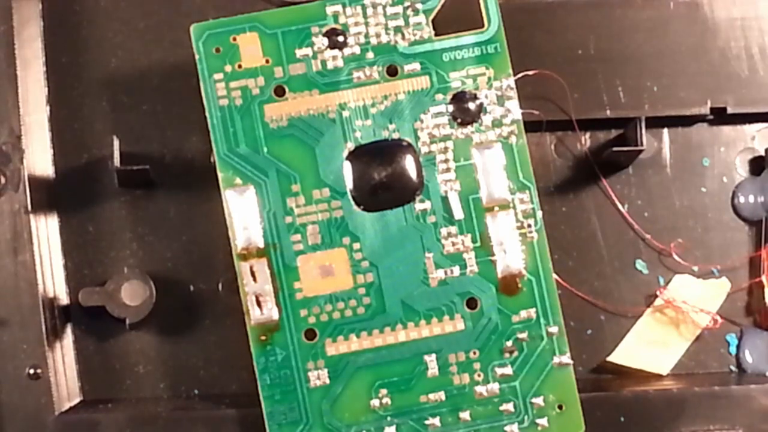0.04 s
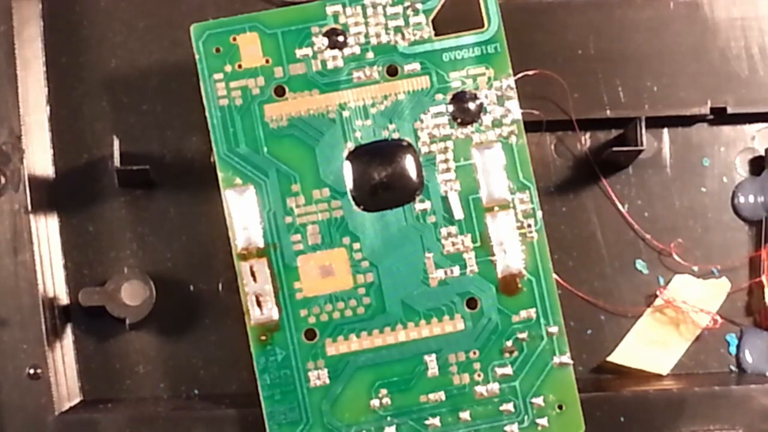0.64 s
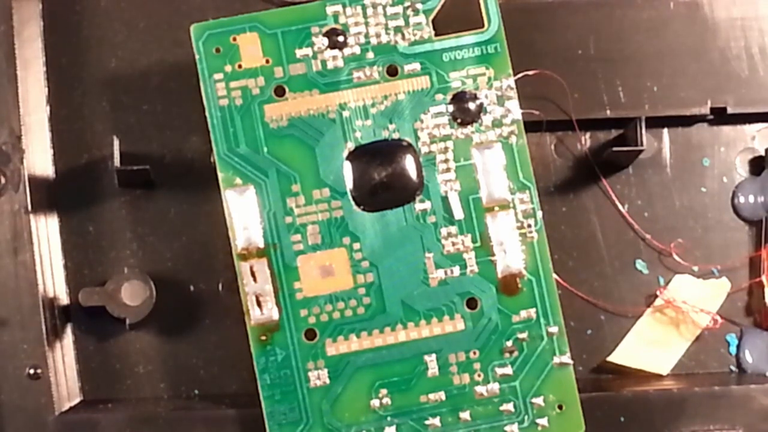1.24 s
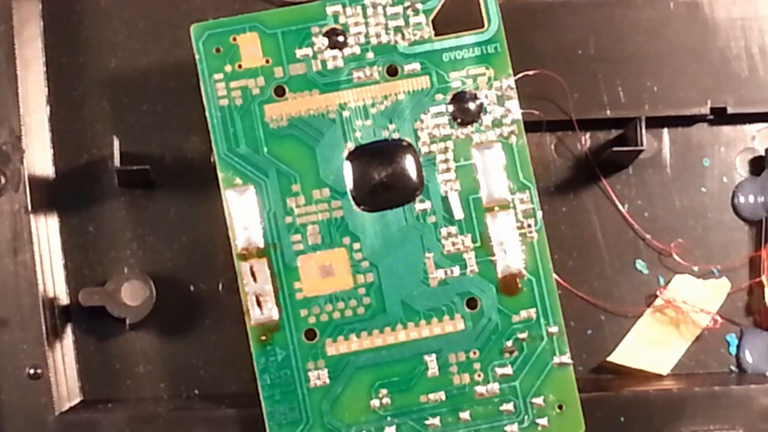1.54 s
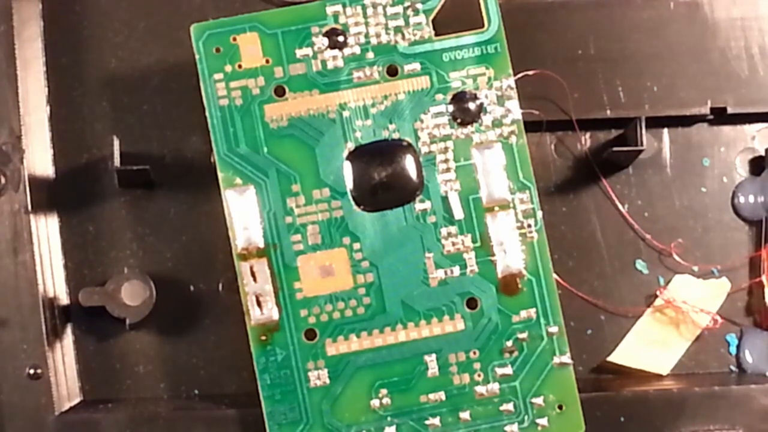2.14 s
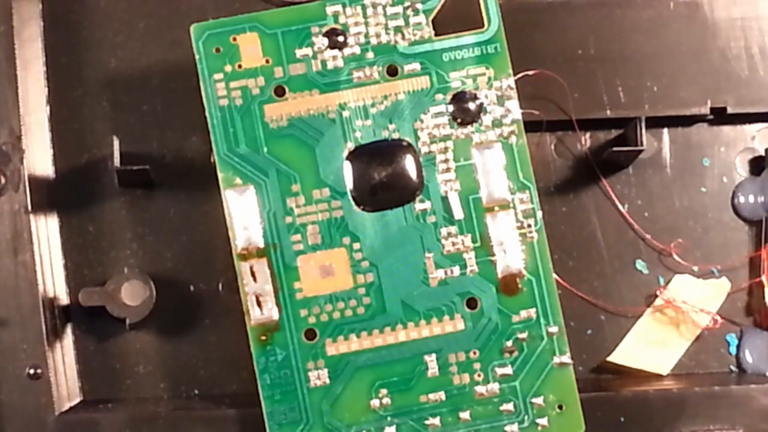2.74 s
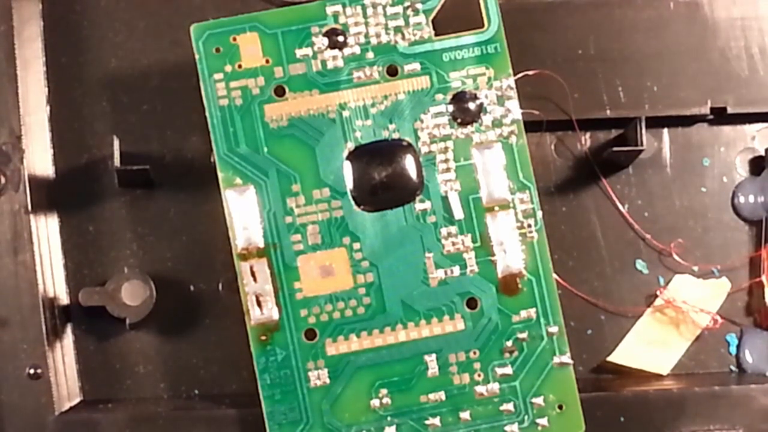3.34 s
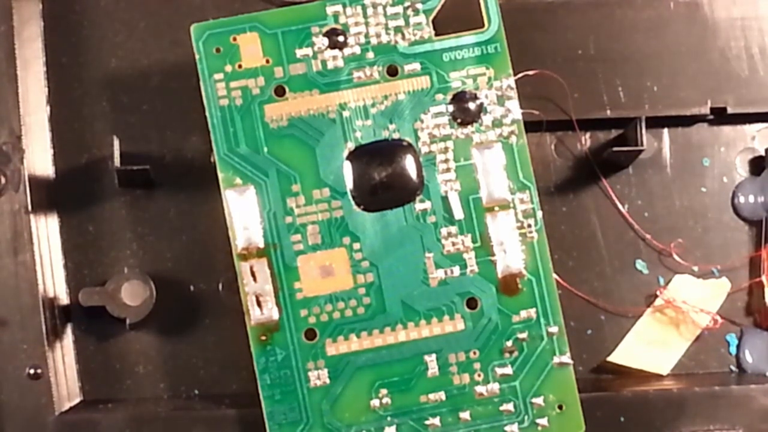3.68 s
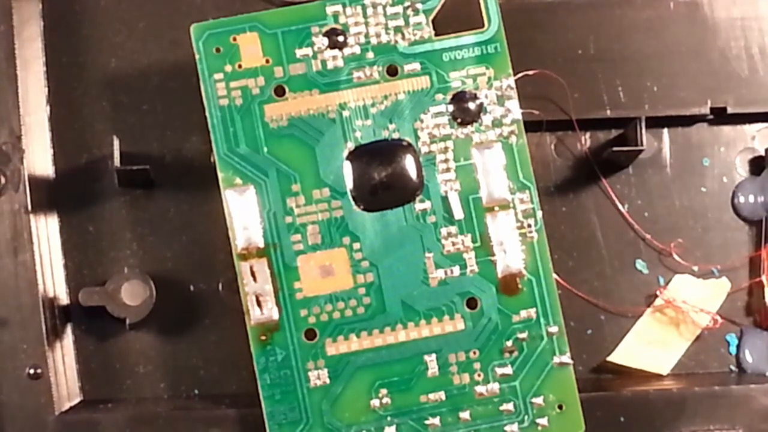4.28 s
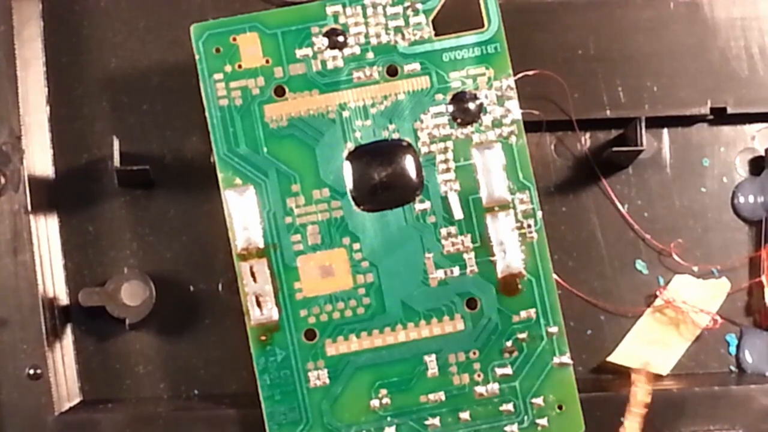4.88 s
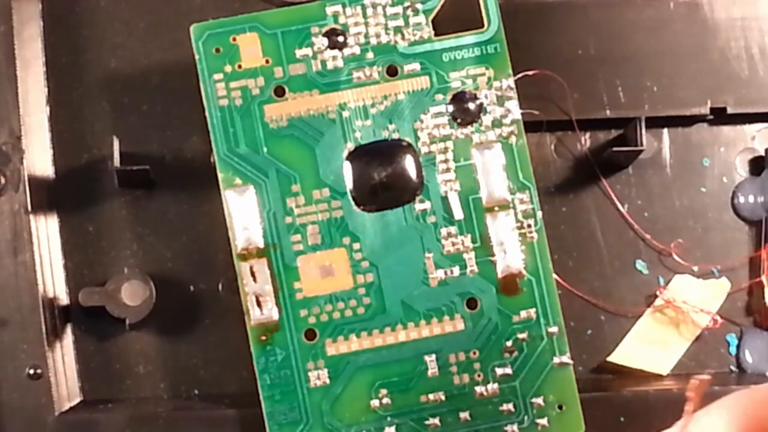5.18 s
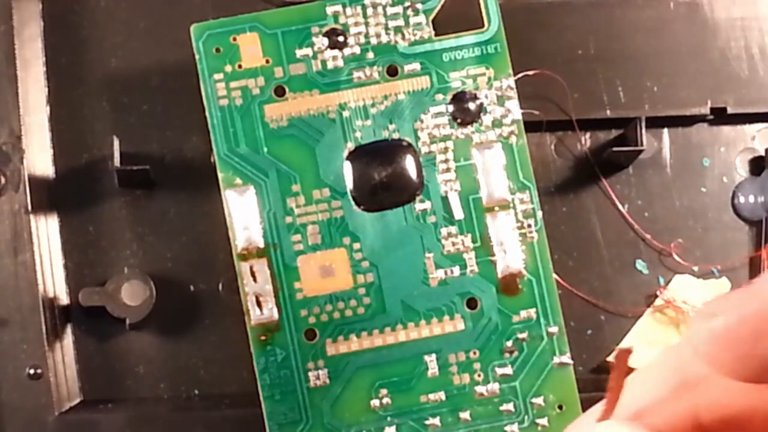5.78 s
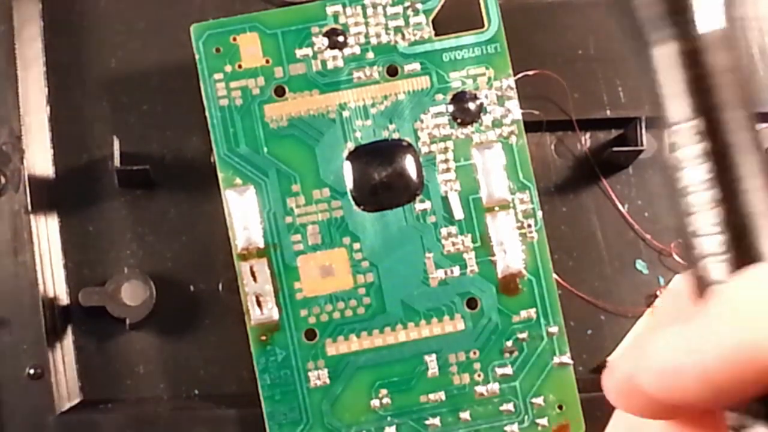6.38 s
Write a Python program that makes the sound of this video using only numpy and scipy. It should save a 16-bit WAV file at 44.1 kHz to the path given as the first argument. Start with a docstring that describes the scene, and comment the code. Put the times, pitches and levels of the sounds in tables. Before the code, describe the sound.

Small metal cutters knock, scrape and clack with a brief ring on a workbench, and snip once through copper wick.

```python
"""Hand tools on a workbench in a small room, heard in stereo from close by.
A fan and mains hum run throughout. After two faint clicks of jaws, a tool is put down with a knock.
Steel cutters graze the bench, are dragged over it, sticking, slipping and squealing, then clack
against it and ring. Their jaws snap shut through a piece of copper wick. Last, they are dropped
back on their tips, skid a little and give one more faint click."""
import sys
import numpy as np
from scipy import signal
from scipy.fft import rfft, irfft
from scipy.io import wavfile
from scipy.ndimage import uniform_filter1d

SR = 44100
rng = np.random.default_rng(int(sys.argv[2]) if len(sys.argv) > 2 else 0)


def bounce(signal):
    """Save signal as a 16-bit WAV file at the path given by the first command-line argument."""
    frames = np.transpose(np.atleast_2d(signal))
    limited = np.clip(frames, -1, 1)
    pcm = np.round(limited * 32767).astype(np.int16)
    wavfile.write(sys.argv[1], SR, pcm)


N = 283122

# the parts of the cutters that can hit the bench: side, tips, edge
CUTTER_PARTS = ["side", "tips", "edge"]


def amp(db):
    """Turn decibels into a gain."""
    return 10 ** (np.asarray(db) / 20)


def along(points, hz):
    """Read a curve of (frequency, value) points on a logarithmic frequency axis."""
    f, value = np.transpose(points)
    return np.interp(np.log(hz + 1), np.log(f), value)


def bins(size):
    """The frequencies in the spectrum of a sound this many samples long."""
    return np.arange(size // 2 + 1) * SR / size


def level(x, db, seconds=.01):
    """Scale a sound so that its energy, spread over the given time, has this average level."""
    return x * amp(db) * np.sqrt(seconds * SR / np.mean(np.sum(x ** 2, axis=-1)))


def add(out, start, x):
    """Mix a sound in at a start time in seconds."""
    i = int(start * SR)
    out[:, i:i + x.shape[1]] += x[:, :N - i]


def convolve(x, response):
    """Pass each channel through a response: the sound a thing makes after one tiny tap."""
    return signal.fftconvolve(np.atleast_2d(x), np.atleast_2d(response), axes=1)


def body(colour, peaks, tilt_db=0, size=8192):
    """How an object answers a tap: a broad tone colour, tilted by tilt_db per octave, plus resonances."""
    f = bins(size)
    db = along(colour, f) + tilt_db * np.log2(np.maximum(f, 200) / 1000)
    db = db + sum(boost / (1 + (2 * (f - hz) / width) ** 2) for hz, width, boost in peaks)
    # folding the cepstrum puts all of the sound after the tap
    cepstrum = irfft(np.log(amp(db)))
    cepstrum[1:size // 2] *= 2
    cepstrum[size // 2 + 1:] = 0
    return irfft(np.exp(rfft(cepstrum)))


def scatter(size):
    """White noise arriving from all sides: left and right are more alike low down than in the treble."""
    likeness = [(40, 0.11), (150, 0.63), (300, 0.58), (600, 0.38), (1200, -0.09), (2500, -0.25),
                (6000, -0.028)]  # how alike the two sides are: f/Hz, correlation
    mid, side = rfft(rng.standard_normal((2, size)))
    alike = np.clip(along(likeness, bins(size)), -1, 1)
    mid, side = mid * np.sqrt((1 + alike) / 2), side * np.sqrt((1 - alike) / 2)
    return irfft(np.array([mid + side, mid - side]), size)


def even(x, width_hz):
    """Give a burst the same energy in every band of this width."""
    spectrum = rfft(x)
    count = max(int(width_hz * x.shape[1] / SR), 1)
    band_power = np.abs(uniform_filter1d(np.abs(spectrum) ** 2, count))
    return irfft(spectrum / np.sqrt(band_power + 1e-12), x.shape[1])


def from_left(x, lead_s):
    """A sound from the left reaches the left channel earlier and with more high treble."""
    shading = [(300, 0.5), (700, -0.5), (1400, -0.5), (2400, -.5), (4400, -1), (8000, 6.5), (15000, 2)]  # difference between the sides: f/Hz, left minus right/dB
    f = bins(x.shape[1])
    shade = amp(along(shading, f) / 2)
    delay = np.exp(-2j * np.pi * f * lead_s)
    return irfft(rfft(x) * np.array([shade, delay / shade]), x.shape[1])


def spread(force, split_hz):
    """A wide surface sends the same bass to left and right, but different treble."""
    f = bins(force.shape[1])
    common, opposed = rfft(force)
    opposed = opposed * f / (f + split_hz)
    return irfft(np.array([common + opposed, common - opposed]), force.shape[1])


def contact(seconds, split_hz, size=4096):
    """The force of a blow: a rattle of tiny contacts that swells and dies within milliseconds."""
    progress = np.arange(size) / SR / max(seconds, 1 / SR)
    swell = progress * np.exp(-progress)
    force = spread(rng.standard_normal((2, size)) * swell, split_hz)
    for _ in range(2):
        force = even(force, width_hz=120) * np.minimum(1, 10 * swell)
    return force


def room(x, wet_db, size=24576):
    """Direct sound plus echoes off the walls that build up within milliseconds; the bass stays longest."""
    echo_times = [(100, 0.8), (250, 0.4), (600, 0.23), (1400, 0.2), (3000, 0.2), (7000, 0.16),
                  (14000, 0.12)]  # the room's echo: f/Hz, time to fade by 60 dB/s
    t, f = np.arange(size) / SR, bins(size)
    noise = rfft(even(scatter(size), width_hz=30))
    centres = [hz for hz, _ in echo_times]
    tail = 0
    for share, (_, fade_s) in zip(np.eye(len(centres)), echo_times):
        band = irfft(noise * along(np.c_[centres, share], f))
        tail = tail + band * np.exp(-np.log(1000) * t / fade_s)
    build_up = 1 - np.exp(-(t / 0.0028) ** 2)
    response = level(tail * build_up, wet_db, 1 / SR)
    response[:, 0] += 1  # the direct sound
    return convolve(x, response)[:, :N]


def fan_and_hum():
    """A fan murmurs in the room's low resonances, over hiss and a little mains hum."""
    colour = [(20, -29), (40, -23.5), (64, -10), (124, -11.5), (200, -10), (280, -7.5), (410, -11.5),
              (690, -15), (900, -15.5), (1900, -17), (3500, -21), (6400, -26), (10000, -24), (14500, -25)]  # tone of the fan's noise: f/Hz, level/dB
    peaks = [(86.7, 46, -7.5), (113.4, 37, 9.5), (176.7, 8.8, 13), (230, 20, 4.5), (273.3, 16, 10),
             (626, 14, 8), (674.3, 21.7, 11)]  # low resonances: f/Hz, width/Hz, boost/dB
    hum_hz = 120
    air = convolve(scatter(N), body(colour, peaks))[:, :N]
    hum = np.sin(2 * np.pi * hum_hz * np.arange(N) / SR)
    return level(air, db=-54, seconds=N / SR) + level(hum, db=-66.5, seconds=N / SR)


def snips():
    """The jaws click shut in the air: one tiny snap and a trace of rattle, brighter when harder."""
    clicks = [(0.102, -49, 1920), (.47, -58, 4840), (2.324, -57, 1700), (4.074, -55, 3230),
              (4.12, -40, 3940), (4.956, -59.5, 3200)]  # jaw clicks, the loudest being the cut: t/s, level/dB, f/Hz
    colour = [(300, -24), (1200, -22), (2600, -10), (3700, -7.5), (5000, -4.5), (7000, -6.5), (8500, -17),
              (14500, -25)]  # tone of a click: f/Hz, level/dB
    peaks = [(3922, 700, 5.5), (7080, 600, 6.5), (9200, 320, 18)]  # resonances of the jaws: f/Hz, width/Hz, boost/dB
    full_snap_db = -38.5
    out = np.zeros((2, N))
    for start, db, hz in clicks:
        softer_db = max(full_snap_db - db, 0)
        rattle = contact(seconds=.0001 * (1 + .65 * softer_db), split_hz=13000)
        force = level(rattle, db=-6.5, seconds=1 / SR)
        force[:, 0] += 1  # the snap itself
        jaws = body(colour, peaks + [(hz, 420, 10)], tilt_db=-0.5 - 0.31 * softer_db)
        click = from_left(convolve(force, jaws), lead_s=.00002)
        add(out, start, level(click, db))
    return room(out, wet_db=-6.0)


def knocks():
    """Blunt blows on the bench: soft ones are slower and duller, hard ones wake the tool's hollow tone."""
    blows = [(.847, -45.5), (.886, -9.5), (0.9099, -20), (.963, -31.5), (1.8, -47.5), (2.115, -46),
             (2.466, -34.5)]  # tools and hand hitting the bench: t/s, level/dB
    colour = [(50, -37.5), (130, -15.5), (280, -6.5), (400, -4.5), (650, -1.5), (1200, -2.5), (1800, -9),
              (2900, -11.5), (4400, -17.5), (5800, -28.5), (8500, -33), (14500, -55.5)]  # tone of a knock: f/Hz, level/dB
    peaks = [(265, 51, 1.5), (410, 49, -12.5), (616, 80, 4.5), (821, 76, 6.5), (980, 60, 3),
             (1850, 160, -1.5), (2096, 110, 11)]  # what a knock rings with: f/Hz, width/Hz, boost/dB
    full_blow_db = -12
    out = np.zeros((2, N))
    for start, db in blows:
        softer_db = max(full_blow_db - db, 0)
        hollow_tone = (1439, 290, 14.5 - 0.95 * softer_db)
        force = contact(seconds=.0018 * (1 + 0.025 * softer_db), split_hz=4500)
        hit = convolve(force, body(colour, peaks + [hollow_tone], tilt_db=-0.26 * softer_db))
        add(out, start, level(from_left(hit, lead_s=0.00024), db))
    return room(out, wet_db=-4.5)


def slides():
    """The cutters graze, drag and skid over the bench; the steel rings where it springs free."""
    graze = [(1.775, -58), (1.8, -55), (1.825, -73)]  # rubbing force as they are reached for: t/s, level/dB
    drag = [(2.368, -47), (2.376, -39), (2.462, -42.5), (2.47, -32), (2.498, -43), (2.564, -32.5),
            (2.596, -36.5), (2.65, -34), (2.7, -41), (2.734, -24.5), (2.786, -60), (2.8, -27.5),
            (2.88, -29.5), (2.894, -45.5), (2.916, -30), (2.936, -49.5), (2.956, -42.5), (2.98, -55)]  # rubbing force as they are dragged: t/s, level before gain/dB
    skid = [(4.56, -34), (4.58, -36), (4.628, -33), (4.66, -52)]  # rubbing force after they are dropped: t/s, level/dB
    releases = [(2.865, "edge", -44), (2.948, "edge", -41), (4.62, "tips", -40)]  # the jaws spring free: t/s, part, ring level/dB
    rubbing = rub(graze, gain_db=0, light_judder_db=0)
    rubbing += rub(drag, gain_db=2, light_judder_db=12.5)
    rubbing += rub(skid, gain_db=0, light_judder_db=9.5)
    rings = np.zeros((2, N))
    for start, part, ring_db in releases:
        add(rings, start, steel_ring(part, ring_db))
    return room(rubbing + squeals(), wet_db=-8.5) + rings


def stick_slip(times, force_db, gain_db, size=32768):
    """The jaws stick and slip in dense, uneven jolts. Gives the sample times and the force."""
    snags = [(2.376, 7), (2.399, 12), (2.469, 8), (2.617, 6)]  # the jaws snag and jerk free: t/s, jump in force/dB
    slips_per_s, slip_s, steady_grip, snag_s = 900, .00092, .6, 0.0022
    t = times[0] + np.arange(size) / SR
    slipping = rng.random(size) < slips_per_s / SR
    slips = slipping * amp(2 * np.minimum(rng.exponential(size=size), 3))
    grip = steady_grip + signal.lfilter([1], [1, -np.exp(-1 / (slip_s * SR))], slips)
    rasp = even(spread(rng.standard_normal((2, size)) * grip, split_hz=5200), width_hz=60)
    jerk_db = sum(db * (t >= start) * np.exp(-np.abs(t - start) / snag_s) for start, db in snags)
    push = amp(np.interp(t, times, force_db) + jerk_db) * (t < times[-1])
    return t, level(rasp, gain_db, size / SR) * push


def rub(curve, gain_db, light_judder_db):
    """Sliding jaws shake the bench: it can judder under a light touch and growls under a hard push."""
    colour = [(60, -40), (130, -20), (260, 0), (520, -0.5), (720, 1.5), (1200, -8.5), (1800, -1.5),
              (2900, -3.5), (4800, -5.5), (5800, -18), (8000, -23), (10500, -25.5), (14500, -43)]  # tone of the rubbing: f/Hz, level/dB
    resonances = [(270.6, 15, 5.5), (394, 16, -31), (467, 44, 10.5), (988, 20, 14.5), (1437, 23, 11.5),
                  (1763, 120, 8.5), (1855, 38, 5.5), (1992, 42, 14), (2400, 120, 0), (2528, 51, 9),
                  (2630, 47, 7), (3190, 57, 12), (3650, 65, 11.5), (3740, 48, 8), (4530, 300, 6),
                  (5270, 140, 4.5), (6830, 150, 10.5), (8800, 65, -3), (10070, 110, 12)]  # what the sliding jaws set ringing: f/Hz, width/Hz, boost/dB
    light_db, hard_db, spot_s = -38, -29, .06
    times, force_db = np.transpose(curve)
    t, force = stick_slip(times, force_db, gain_db)
    out = np.zeros((2, N))
    for moment in np.arange(times[0], times[-1] + spot_s, spot_s):
        pressed_db = np.interp(moment, times, force_db)
        hard = np.clip((pressed_db - light_db) / (hard_db - light_db), 0, 1)
        light = 1 - hard
        judder = (744, 113, light * light_judder_db - hard * 1.5)
        growl = (1290, 550, hard * 3.5 - light * 5.5)
        peaks = np.array(resonances + [judder, growl], float)
        # the point of contact travels, and each spot rings a little differently
        detune, reweight = rng.uniform(-0.98, 1, (2, len(peaks)))
        peaks[:, 0] *= 1 + .018 * detune
        peaks[:, 2] += 2.5 * reweight
        spot = level(body(colour, peaks, tilt_db=light * 0.44 + hard * 0.16), 0, 1 / SR)
        crossfade = np.maximum(1 - np.abs(t - moment) / spot_s, 0)
        add(out, times[0], from_left(convolve(force * crossfade, spot), lead_s=.00012))
    return out


def squeals(size=8192):
    """Where the jaws catch, friction feeds a few of their narrow resonances."""
    catches = [(2.375, .085, -43), (2.847, 0.0366, -37), (2.907, .02, -37.5)]  # the jaws catch: t/s, length/s, level/dB
    tones = [(4290, 34, 0), (1910, 21, -2), (6620, 54, -12)]  # tones of the squeal: f/Hz, width/Hz, level/dB
    out = np.zeros((2, N))
    t = np.arange(size) / SR
    jaws = sum(amp(db) * np.sqrt(width) * np.exp(-np.pi * width * t) * np.sin(2 * np.pi * hz * t)
               for hz, width, db in tones)
    for start, seconds, db in catches:
        burst = rng.standard_normal((2, size)) * (t < seconds)
        force = even(spread(burst, split_hz=4600), width_hz=100)
        squeal = from_left(convolve(force, jaws), lead_s=.00004)
        add(out, start, level(squeal, db, seconds))
    return out


def steel_ring(part, db, size=28000):
    """The cutters and the bench under them ring on; the part struck sets how loud each tone is."""
    # ringing tones: f/Hz, time to fade by 60 dB/s, side level/dB, tips level/dB, edge level/dB
    tones = [(273, 0.39, -11.5, -6, -23), (354, 0.51, -18.5, -17, -4), (539, 0.55, -35, -6, -15),
             (665, 0.35, -4, -32, -10), (1540, 0.38, -8, -7, -30), (1684, 0.4, 0, -5, -18),
             (1860, 0.16, -35, -28, 2), (1888, 2.3, -28, -27, -40), (2080, 3.9, -32, -38, -39),
             (2674, 0.16, -9, -25, -5), (2920, 0.75, -23, -27, -27), (3210, 0.2, -20, -5, 1),
             (3380, 0.72, -25, -11, -24), (3585, 1.03, -26, -28, -15.5), (3725, 0.65, -30, -19, -27),
             (6500, 0.35, -21, -21, -29), (9360, 0.36, -17.5, -35, -35)]
    t = np.arange(size) / SR
    ring = 0
    for hz, fade_s, *part_db in tones:
        # left and right drift further out of step for higher tones
        phase = rng.uniform(0, 2 * np.pi) + rng.standard_normal((2, 1)) * min(hz / 3000, 1)
        fade = amp(db + part_db[CUTTER_PARTS.index(part)]) * np.exp(-np.log(1000) * t / fade_s)
        ring = ring + fade * np.sin(2 * np.pi * hz * t + phase)
    return ring * (1 - np.exp(-t / 0.0023))


def clacks():
    """Steel meets the bench: a hard crack, a thud of the struck spot, then the ring."""
    # the cutters land: t/s, part, level/dB, contact time/s, tilt/dB per octave, ring level/dB
    landings = [(3.1825, "side", -20, 0.0033, -0.5, -29.5), (4.5085, "tips", -13.5, 0.0028, 2.5, -32.5)]
    colour = [(50, -39), (120, -6), (300, -7), (700, -1), (1500, -0.5), (2400, -2), (3700, -0.5),
              (4700, -0.5), (6000, -9), (8500, -13.5), (14500, -22)]  # tone of a clack: f/Hz, level/dB
    # short resonances of cutters and bench together: f/Hz, width/Hz, side boost/dB, tips boost/dB
    resonances = [(264, 68, 4, 12), (476.4, 43, 15, 20), (607, 124, -14, -0.5), (711, 212, 10, 26.5),
                  (883, 63, -18, -9), (1092, 65, 11, 10), (1540, 134, 16.5, -6), (1688, 53, -17, 14.5),
                  (2025, 68, -11, -12), (2060, 160, 7, 13), (2270, 62, -9, -5), (2640, 150, 7, 5),
                  (3170, 180, 11, 5), (3840, 100, 12, 4)]
    out, rings = np.zeros((2, 2, N))
    for start, part, db, contact_s, tilt_db, ring_db in landings:
        peaks = [(hz, width, boost[CUTTER_PARTS.index(part)]) for hz, width, *boost in resonances]
        hit = convolve(contact(contact_s, split_hz=1600), body(colour, peaks, tilt_db))
        add(out, start, level(from_left(hit, lead_s=.0001), db))
        add(rings, start, steel_ring(part, ring_db))
    return room(out, wet_db=-4.5) + rings


def lower_hiss(x, threshold_db, depth_db, release_s):
    """The treble is turned down in the quiet and stays open for a moment after each loud sound."""
    loud = uniform_filter1d(np.mean(x ** 2, axis=0), SR // 100) > amp(threshold_db) ** 2
    i = np.arange(N)
    since_loud = (i - np.maximum.accumulate(np.where(loud, i, -N))) / SR
    treble = signal.sosfilt(signal.butter(1, 3000, "high", fs=SR, output="sos"), x)
    treble_gain = amp(-depth_db * (1 - np.exp(-since_loud / release_s)))
    return x - treble * (1 - treble_gain)


def scene():
    """Everything on the bench, over the fan and hum."""
    return knocks() + clacks() + slides() + snips() + fan_and_hum()


def record(dry):
    """Lower the hiss, round off the highest peaks and cut the very top of the treble."""
    ceiling, top_hz = .78, 14700
    clean = lower_hiss(dry, threshold_db=-47, depth_db=6.0, release_s=0.13)
    rounded = clean / (1 + (clean / ceiling) ** 6) ** (1 / 6)
    return signal.sosfilt(signal.ellip(10, .2, 70, top_hz, fs=SR, output="sos"), rounded)


dry = scene()
out = record(dry)
bounce(out)
```